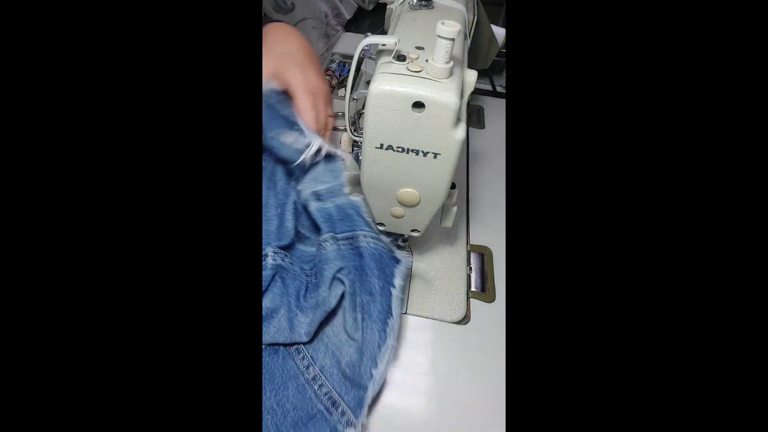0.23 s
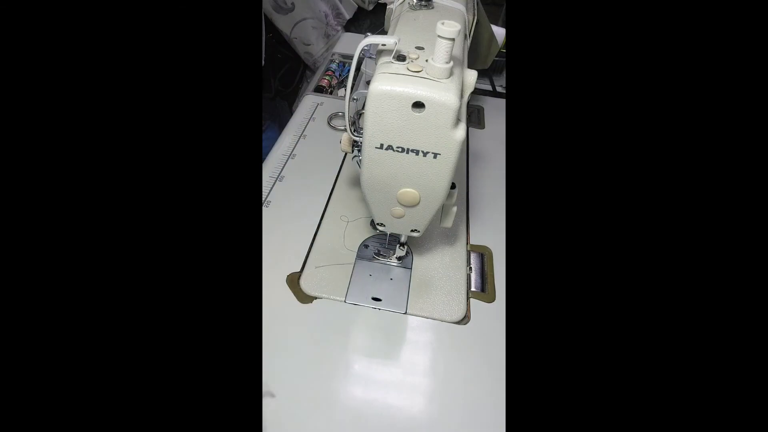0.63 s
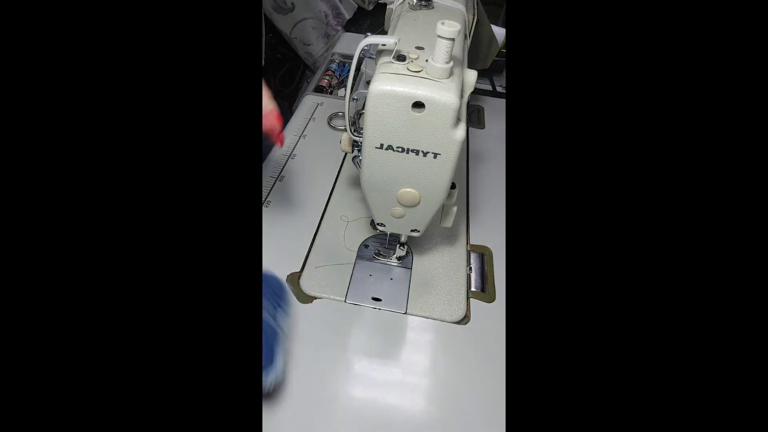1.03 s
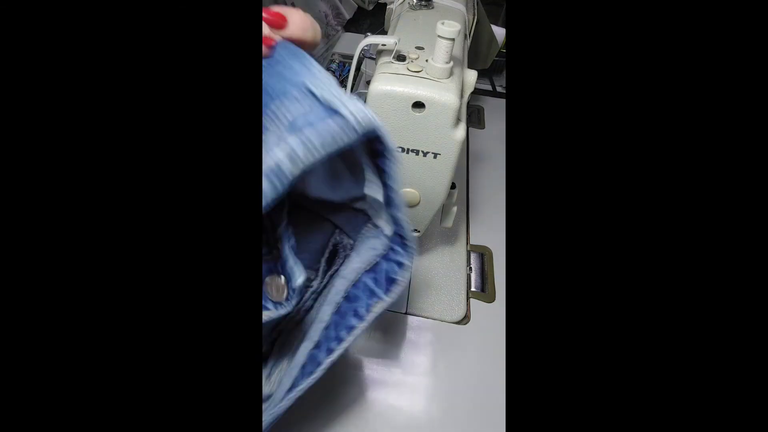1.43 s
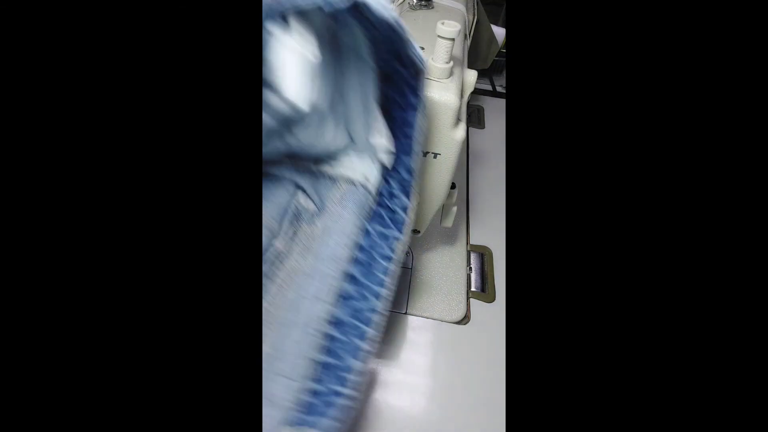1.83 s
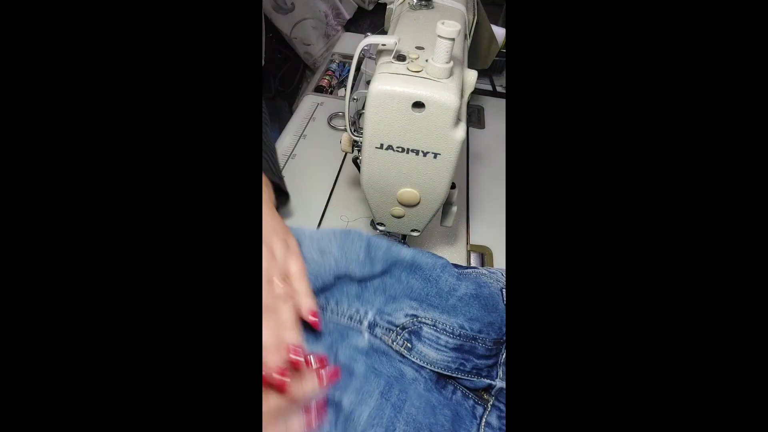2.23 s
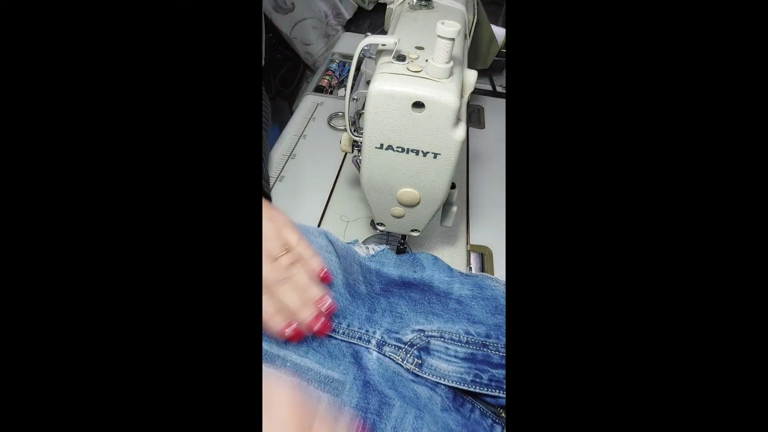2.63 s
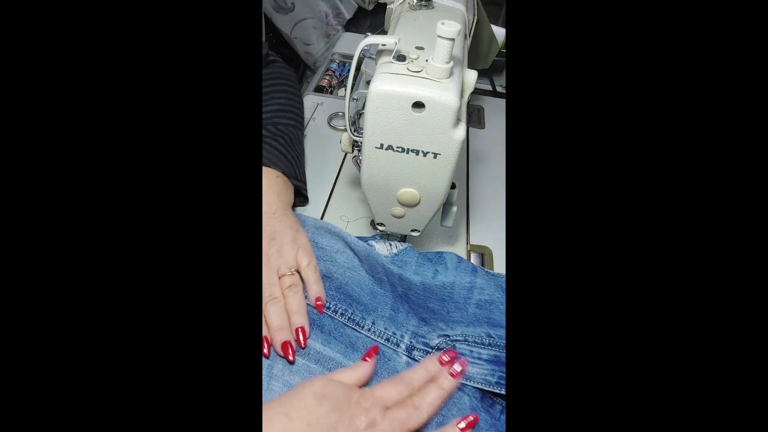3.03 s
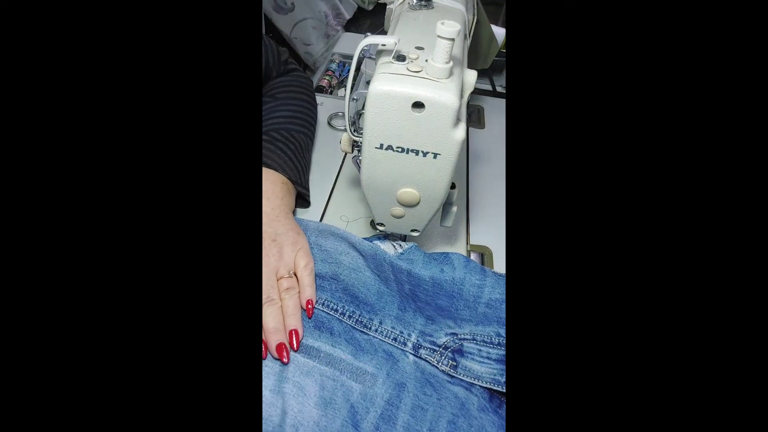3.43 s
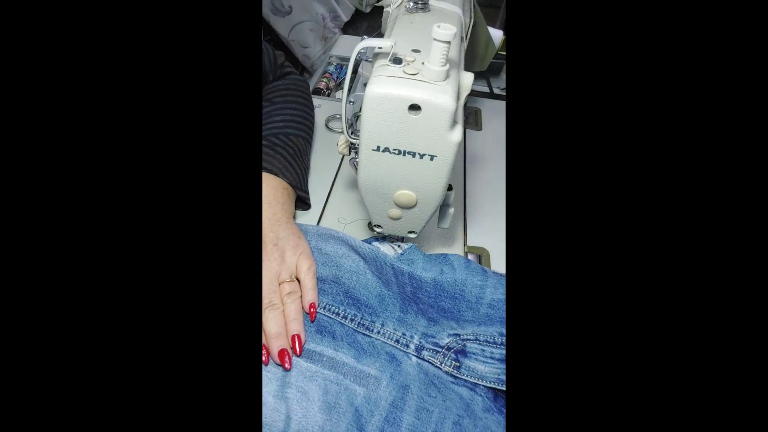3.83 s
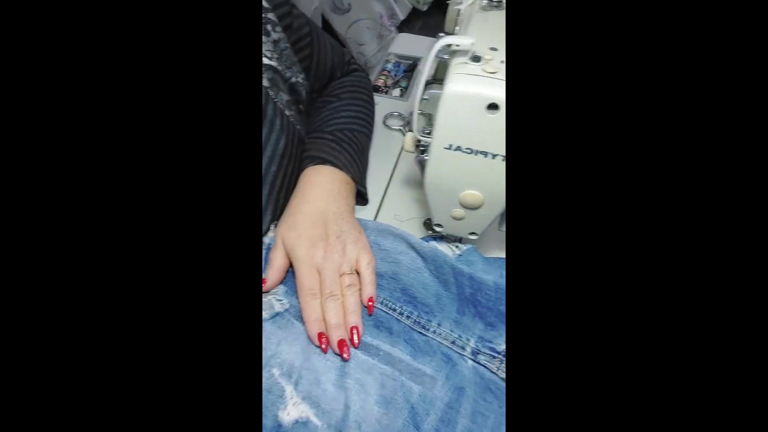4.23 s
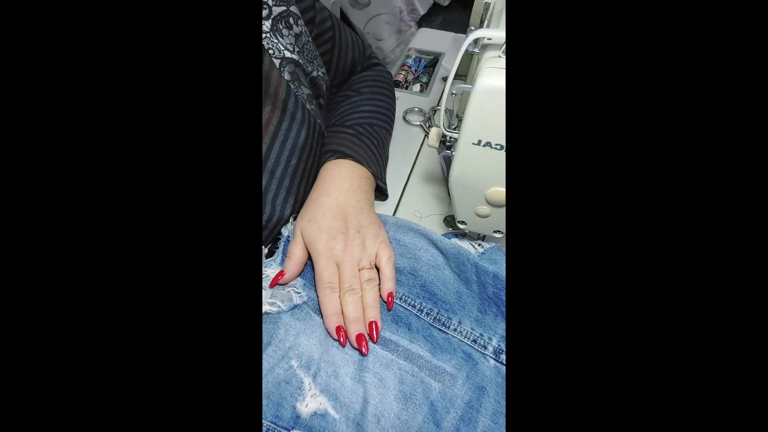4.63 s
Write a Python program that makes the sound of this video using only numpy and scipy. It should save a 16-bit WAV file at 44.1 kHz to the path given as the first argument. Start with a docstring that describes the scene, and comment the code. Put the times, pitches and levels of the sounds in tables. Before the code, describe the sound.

Stiff denim is dragged, flapped and smoothed on a sewing-machine table, with soft thumps, a brief metallic skid and a final knock.

```python
"""Jeans on a sewing-machine table

Stiff jeans are pulled off the table, turned over, laid down again and smoothed by hand. The denim
brushes and flaps, its weight thumps on the top, seams and fingernails tick, and a metal button skids
ringing over the steel bed. At the end a hard, hollow object is nudged and knocks against the table.
Small workshop, close microphone."""
import sys
import numpy as np
from scipy import signal
from scipy.fft import rfft, irfft
from scipy.io import wavfile

SR = 44100
rng = np.random.default_rng(int(sys.argv[2]) if len(sys.argv) > 2 else 0)


def materialize(psi):
    """Save the field psi as 16-bit PCM at rate SR to the path in sys.argv[1].

    A 1-D psi becomes a single channel; in a 2-D psi each row is a channel.
    """
    bounded = np.clip(np.atleast_2d(psi).T, -1, 1)
    quanta = np.round(bounded * 32767).astype(np.int16)
    wavfile.write(sys.argv[1], SR, quanta)


N = 210308
TIME = np.arange(N) / SR
AGE = TIME[:SR // 4]   # seconds since a contact began


def from_db(db):
    """Decibels to gain."""
    return 10 ** (np.asarray(db) / 20)


def unit_rms(x):
    """Scale to rms 1."""
    return x / np.sqrt(np.mean(x ** 2) + 1e-20)


def at_hz(points, hz):
    """Read a curve on a log-frequency axis."""
    freqs, values = np.transpose(points)
    return np.interp(np.log(hz + 1e-9), np.log(freqs), values)


def highpass(x, hz, order=2):
    """Butterworth low cut."""
    return signal.sosfilt(signal.butter(order, hz, "high", fs=SR, output="sos"), x + 1e-18)


def panned(x, pan_db):
    """Place a sound in stereo; pan_db is left level minus right."""
    return x * from_db(np.array([[.5], [-.5]]) * pan_db)


def add(track, start_s, sound):
    """Mix a short sound into a track at its cue."""
    part = track[..., max(round(start_s * SR), 0):][..., :len(AGE)]
    part += sound[..., :part.shape[-1]]


def drift(rate_hz):
    """A random wobble, gliding from value to value; rms 1."""
    knots = rng.standard_normal(4000)
    return unit_rms(np.interp(TIME * rate_hz, np.arange(len(knots)), knots))


# Stereo image, narrow in the bass and wide on top: freq_hz, correlation
STEREO_LIKENESS = [(60, 0.46), (130, 1), (290, 0.44), (640, 0.5), (1400, -0.25), (3100, .05),
                   (15000, 0.091)]


def noise(colour):
    """Stereo noise shaped by (freq_hz, level_db) points; rms 1."""
    hz = np.arange(N // 2 + 1) * SR / N
    mid, side = rfft(rng.standard_normal((2, N))) * from_db(at_hz(colour, hz))
    alike = np.clip(at_hz(STEREO_LIKENESS, hz), -1, 1)
    spectrum = np.sqrt(1 + alike) * mid + np.sqrt(1 - alike) * side * [[1], [-1]]
    return unit_rms(irfft(spectrum, N))


def burst(decay_s, rise_s):
    """Force of one contact: fast attack, exponential decay; peak 1."""
    shape = (1 - np.exp(-AGE / rise_s)) ** 2 * np.exp(-AGE / max(decay_s, 3e-4))
    return shape / shape.max()


def resonate(x, modes):
    """Parallel resonators of alternating polarity."""
    out = 0
    for k, (hz, width_hz, db) in enumerate(modes):
        radius = np.exp(-np.pi * width_hz / SR)
        poles = [1, -2 * radius * np.cos(2 * np.pi * hz / SR), radius ** 2]
        gain = (-1) ** k * from_db(db) * (1 - radius ** 2) / 2
        out = out + gain * signal.lfilter([1, 0, -1], poles, x + 1e-18)
    return out


def grains(per_s, spread_db):
    """Tiny catches of uneven size at random moments; rms 1."""
    born = rng.random((2, N)) < per_s / SR
    sizes = from_db(spread_db * np.minimum(rng.exponential(1, (2, N)), 4))
    return unit_rms(born * sizes * rng.choice([-1, 1], (2, N)))


def stray_contacts(per_s, decay_s):
    """Force of small, uneven contacts at random moments."""
    hits = (rng.random(N) < per_s / SR) * rng.random(N)
    return signal.fftconvolve(hits, burst(decay_s, rise_s=0.00087))[:N]


def stroke(start_s, length_s, rise_share=0.31, release_db_per_s=190):
    """One movement gathers speed, holds it, then comes to rest; peak 1."""
    age = TIME - start_s
    rise = np.clip(age / (rise_share * length_s), 0, 1)
    release = from_db(-release_db_per_s * np.maximum(age - length_s, 0))
    return np.sin(rise * np.pi / 2) ** 2 * release


def movements(rows):
    """One envelope for each level column of a stroke table; overlaps add in power."""
    gains = (from_db(levels)[:, None] * stroke(start_s, length_s) for start_s, length_s, *levels in rows)
    return np.sqrt(sum(gain ** 2 for gain in gains))


# Colour of the quiet workshop: freq_hz, level_db
ROOM_TONE_COLOUR = [(20, -12.5), (45, 0), (130, -3.5), (190, -14), (270, -6.5), (440, -25), (1200, -30),
                    (3000, -38), (15000, -38.5)]


def room_tone():
    """A faint, steady, bass-heavy bed, leaning left."""
    return panned(from_db(-65) * noise(ROOM_TONE_COLOUR), pan_db=4.5)


# Reverb time of the workshop: freq_hz, t60_s
ROOM_DECAY = [(80, 0.58), (500, 0.21), (3000, 0.15), (14000, 0.17)]


def room_reverb(send):
    """Diffuse reflections build over a few milliseconds; the bass hangs on longest."""
    age, tail = TIME[:SR // 2], 0
    for low_hz in 45 * 2 ** np.arange(9):
        octave = signal.butter(2, [low_hz, min(2 * low_hz, .45 * SR)], "band", fs=SR, output="sos")
        scatter = signal.sosfilt(octave, rng.standard_normal((2, len(age))))
        tail = tail + scatter * from_db(-60 * age / at_hz(ROOM_DECAY, low_hz * np.sqrt(2)))
    tail = unit_rms(tail * np.minimum(age / .006, 1)) / np.sqrt(len(age))
    return signal.fftconvolve(send, tail, axes=1)[:, :N]


# Body of the hollow object: pitch_hz, width_hz, level_db
HOLLOW_MODES = [(438.5, 67, 13), (1090, 117, 2), (1360, 124, -3), (2310, 300, -5.5), (4473, 270, -21.5)]
# Colour of the table under anything that slides: freq_hz, level_db
RUMBLE_COLOUR = [(20, -19.5), (45, -0.5), (65, 3.5), (120, -1), (190, -7), (270, -2), (380, -17.5),
                 (700, -45.5)]
# Small shoves leading up to the knock: start_s, length_s, rub_db, drone_db
NUDGE_CUES = [(4.07, 0.032, -61.5, -66.5), (4.24, 0.061, -58, -53), (4.32, 0.14, -63.5, -60.5),
              (4.5, 0.13, -76, -51.5)]


def nudged_object(drone_hz=108.6, drone_width_hz=31):
    """The hollow object rubs faintly as it is moved, and a table resonance drones under it."""
    rub_gain, drone_gain = movements(NUDGE_CUES)
    drone = unit_rms(resonate(noise(RUMBLE_COLOUR), [(drone_hz, drone_width_hz, 0)]))
    rub = unit_rms(resonate(grains(per_s=600, spread_db=-4), HOLLOW_MODES))
    return rub_gain * rub + drone_gain * drone


# Ring of the closing knock: pitch_hz, level_db, t60_s
KNOCK_MODES = [(102, -9, 1.5), (236, -4, .2), (293, -5, .14), (355, -8, .15), (506, -12, .18),
               (833, -14, .11), (1009, -1, .13), (1083, 0, .13), (1135, -4, .12), (1222, -1, .13),
               (1390, -2, .11), (1443, -6, .09), (1800, -9, .09), (1911, -4, .1), (2035, 2, .1),
               (2113, 1, .1), (2210, -2, .11), (2304, -7, .09), (2610, -11, .09), (3429, -27, .2)]


def knock(start_s=4.63, gain_db=-26.5):
    """A hard object hits the table: a short crack, low modes that swell, high ones that ring wide."""
    ringing, force = np.zeros((2, 2, N))
    for hz, db, t60_s in KNOCK_MODES:
        width = np.clip(1 - at_hz(STEREO_LIKENESS, hz), 0, 1)
        phase = rng.uniform(-np.pi, np.pi, (2, 1)) * width
        swell = 1 - np.exp(-AGE * hz / 3.2)   # attack of about three cycles
        mode = from_db(db - 60 * AGE / t60_s) * swell * np.sin(2 * np.pi * hz * AGE + phase)
        pan_db = at_hz([(100, -9), (400, -12), (1300, -4), (2200, 2)], hz)
        add(ringing, start_s, panned(mode, pan_db))
    add(force, start_s, burst(decay_s=0.0077, rise_s=0.00073))
    crack = force * noise([(150, 2), (1000, -2.5), (2200, 2.5), (3500, -11), (7000, -24), (15000, -28.5)])
    return from_db(gain_db) * (ringing + from_db(3.5) * crack)


# Bright ring of the button and steel bed: pitch_hz, width_hz, level_db
METAL_MODES = [(3440, 80, -24), (4080, 30, -26), (4360, 30, -24), (4640, 25, -25), (4840, 25, -22),
               (5240, 42, -12), (5540, 30, -13), (6120, 35, -14), (6830, 50, -11), (7340, 65, -10),
               (8850, 45, -3), (9050, 75, -5), (10170, 60, -5), (11170, 32, 0), (11480, 32, -1),
               (11810, 65, 0), (12260, 85, -3), (12900, 150, -13), (13550, 42, 0), (14200, 70, -9),
               (15340, 55, -2)]
# Skids of the button: start_s, level_db, decay_s
SKID_CUES = [(0.237, -8, 0.0092), (0.239, -6.5, 0.039), (0.274, -14, 0.034), (0.296, -7, 0.0057),
             (0.315, -16, 0.035), (0.384, -16, 0.0034), (0.436, -23, 0.0063), (0.497, -44.5, 0.0092)]


def button_skids():
    """Metal skids on steel: chattering stick-slip catches ring its high modes over a dry scratch."""
    pressure = np.zeros(N)
    for start_s, db, decay_s in SKID_CUES:
        add(pressure, start_s, from_db(db) * burst(decay_s, rise_s=0.0048))
    chatter = from_db(3.2 * drift(rate_hz=450))
    catches = pressure * chatter * grains(per_s=9000, spread_db=-4.5)
    # the point of contact wanders, so each mode's level wavers on its own
    ringing = sum(resonate(catches * from_db(6 + 0.47 * drift(rate_hz=45)), [m]) for m in METAL_MODES)
    scratch = from_db(-12) * highpass(catches, 9500, order=6)
    return panned(ringing + scratch, pan_db=-1.5)


# Ticks of seams, rivets and fingernails: start_s, level_db, pan_db, decay_s
TICK_CUES = [(0.0388, -12.5, 3, 0.0063), (0.0675, -13.5, -3, 0.0032), (0.118, -29, -2, 0.0031),
             (0.162, -32.5, 0, 0.0045), (0.17, -26.5, -3, 0.0028), (0.241, -8, 0, 0.0037),
             (0.698, -38, -2, 0.0051), (1.061, -48.5, -5, .003), (1.088, -41.5, -2, 0.0032),
             (1.5772, -41.5, -2, 0.0023), (1.634, -42, 0.5, 0.0064), (1.8593, -29.5, -10.5, .002),
             (1.892, -34, 9, .002), (2.1836, -26, 6, 0.0042), (2.214, -30, -4, .002),
             (2.249, -16.5, -2.5, 0.0013), (2.3076, -20.5, -2, 0.0071), (2.324, -19, 3, 0.0057),
             (2.3536, -21, -0.5, 0.0015), (2.36, -31.5, 3, 0.0017), (2.431, -41.5, -1, 0.0045),
             (2.487, -24.5, -2, .0015), (2.506, -17, 2.5, 0.0029), (3.0294, -27, -1, 0.005),
             (3.9513, -52, -13.5, .003), (4.254, -46, -10, 0.0034), (4.4106, -34.5, -4.5, 0.0034)]


def seam_ticks():
    """A hard spot catches and lets go in a tight cluster of snaps; the metal answers faintly."""
    force = np.zeros((2, N))
    for start_s, db, pan_db, decay_s in TICK_CUES:
        add(force, start_s, panned(from_db(db - 8.5) * burst(decay_s, rise_s=0.00024), pan_db))
    snaps = force * highpass(grains(per_s=31000, spread_db=8), 2100)
    return snaps + from_db(-5) * resonate(snaps, METAL_MODES)


# Midrange rustle of the folds: freq_hz, level_db
RUSTLE_COLOUR = [(150, -17.5), (350, -3), (550, -1), (850, 0), (1300, -7), (2400, -9.5), (4000, -25),
                 (9000, -44)]
# Airy hiss of the weave: freq_hz, level_db
HISS_COLOUR = [(500, -12), (1200, 2), (2200, 2), (3200, -2), (4500, 1), (6500, -4), (7800, -1), (9500, -4),
               (12500, 1.4), (15500, -6), (17000, -14)]
# Fading bed of hiss and rustle, as held jeans never lie quite still: time_s, level_db
HANDLING_BED = [(0.0, -65), (2.4, -72), (2.85, -78.5), (3.9, -86.5)]
# Dragging, lifting, spreading and smoothing: start_s, length_s, hiss_db, rustle_db
CLOTH_STROKES = [(0.03, 0.29, -65, -56.5), (0.28, 0.059, -38.5, -35), (0.44, 0.069, -59.5, -46.5),
                 (0.58, 0.16, -65, -62), (0.81, 0.14, -65.5, -59.5), (1.04, 0.12, -66.5, -66),
                 (1.29, 0.099, -64.5, -57), (1.41, 0.1, -62.5, -60), (1.6, 0.23, -62, -58.5),
                 (1.84, 0.066, -51, -53.5), (1.92, 0.21, -53.5, -56.5), (2.14, 0.14, -55.5, -47),
                 (2.45, 0.067, -54, -45), (2.47, 0.26, -47, -54), (2.94, 0.1, -55, -50.5),
                 (3.05, 0.11, -59.5, -66), (3.15, 0.25, -54, -60.5), (3.42, 0.31, -73.5, -81),
                 (4.07, 0.05, -76.5, -72.5), (4.245, 0.042, -62.5, -70), (4.395, 0.032, -63, -55.5)]


def sliding_denim():
    """The weave hisses and its threads catch, folds rustle in fits, and the table rumbles underneath."""
    bed_db = np.interp(TIME, *np.transpose(HANDLING_BED))
    weave, folds = np.hypot(movements(CLOTH_STROKES), from_db(bed_db))
    creases = from_db(1) * stray_contacts(per_s=13, decay_s=0.0035)   # small folds giving way
    folds = folds * (1 + creases)
    rumble_swing = (folds / from_db(-57.5)) ** 0.69   # rides the rustle with less dynamic range
    rumble = from_db(-56) * rumble_swing * noise(RUMBLE_COLOUR)
    rustle = folds * from_db(-2 + 0.86 * drift(rate_hz=77)) * noise(RUSTLE_COLOUR)
    hiss = weave * from_db(-0.23 + drift(rate_hz=370)) * noise(HISS_COLOUR)
    catching = from_db(-10) + from_db(4.5) * stray_contacts(per_s=5, decay_s=0.002)
    threads = weave * catching * highpass(grains(per_s=1100, spread_db=2), 2500)
    return rumble + rustle + panned(hiss + threads, pan_db=-1.5)


# Folds slapping down: start_s, level_db, puff_decay_s, pop_pitch_hz
FLAP_CUES = [(0.037, -18, 0.024, 2375), (0.065, -19, 0.0041, 400), (0.239, -13.5, 0.0047, 894),
             (0.306, -13.5, 0.0024, 1120), (0.312, -13, 0.019, 570), (0.381, -24, 0.019, 1130),
             (0.437, -32, 0.016, 907), (0.956, -49, 0.012, 458), (1.309, -43.5, 0.0022, 710),
             (1.358, -41.5, 0.0053, 536), (1.472, -43, 0.0031, 495), (1.736, -47.5, 0.006, 664),
             (2.189, -26, 0.0019, 680), (2.235, -33.5, 0.0018, 470), (2.302, -29.5, 0.0065, 670),
             (2.4435, -27.5, 0.0032, 714), (2.484, -30, 0.012, 544), (2.504, -32, 0.0063, 510),
             (2.513, -27, 0.0022, 620), (2.961, -35, 0.021, 760), (3.002, -36.5, 0.0088, 387)]


def denim_flaps():
    """A stiff fold slaps down: a puff of noise, and a short hollow pop from the air trapped under it."""
    force, pops = np.zeros((2, 2, N))
    for start_s, db, decay_s, hz in FLAP_CUES:
        phase = rng.normal(0, 1, (2, 1))
        pop = burst(decay_s=0.0017, rise_s=0.00079) * np.sin(2 * np.pi * hz * AGE + phase)
        add(pops, start_s, from_db(db) * pop)
        add(force, start_s, from_db(db) * burst(decay_s, rise_s=0.00054))
    puff = noise([(120, -19), (350, -1), (550, -7.5), (680, -6.5), (880, -2.5), (1600, -3.5),
                  (3000, -17), (4500, -29), (9000, -43)])
    return from_db(-6.5) * force * puff + from_db(-0.5) * pops


# Body of the table top: pitch_hz, width_hz, level_db
TABLE_MODES = [(62.4, 27, -3), (81.8, 32, 0.5), (121, 47, 1), (151.8, 3.3, -5.5), (255.8, 26, -2.5),
               (303.9, 30, 2), (370, 54, -9.5), (582, 15, -17)]
# Low thumps of cloth and hands landing; at 0.248 s, a puff of air hits the left microphone:
# start_s, level_db, pan_db, pitch_hz, decay_s
THUMP_CUES = [(0.045, -28, -3, 118, 0.017), (0.067, -13.5, -2, 136, 0.0079),
              (0.082, -21.5, -4, 267, 0.0084), (0.123, -41, 1, 103, 0.015), (0.246, -21, -3, 281.5, 0.0073),
              (0.248, -25.5, 19, 73.4, 0.0059), (0.306, -26, -21.5, 295, 0.0076),
              (0.315, -21.5, -5, 250, 0.007), (0.319, -22, -2, 117, .014), (0.341, -34, 5, 255, .012),
              (0.382, -30.5, -6.5, 307, 0.03), (0.483, -31.5, -6, 172, 0.0051),
              (0.533, -42, -2, 123, 0.012), (0.645, -44.5, 1, 160.6, 0.019), (0.706, -42, -3, 175.5, 0.02),
              (1.317, -38, -3, 74.9, 0.0091), (1.742, -41.5, -0.5, 84, 0.0073),
              (2.193, -17.5, -9, 131, 0.0013), (2.236, -25.5, -2.5, 119, 0.0053),
              (2.308, -33.5, 0, 262.3, 0.013), (2.5, -25.5, -4, 98, 0.0074), (2.519, -26, -1, 109.5, 0.015),
              (2.966, -26, 1, 132, 0.012), (3.002, -25, 0, 78, 0.0082), (3.022, -34.5, -3, 111, 0.02)]


def low_thumps():
    """Each thump is a few damped low swings and a dull burst of noise, coloured by the table's modes."""
    swings, envelope = np.zeros((2, 2, N))
    for start_s, db, pan_db, hz, decay_s in THUMP_CUES:
        force = panned(from_db(db) * burst(decay_s, rise_s=0.0024), pan_db)
        add(swings, start_s, force * np.sin(2 * np.pi * hz * AGE))
        add(envelope, start_s, force)
    thud = envelope * noise([(30, -2.5), (300, -2), (600, -4), (1500, -29)])
    body = resonate(from_db(-12.5) * swings + from_db(-6) * thud, TABLE_MODES)
    return swings + from_db(-14) * thud + body


def scene():
    """Hits and skids feed the reverb; room tone, sliding denim and nudges stay dry."""
    soft_hits = low_thumps() + denim_flaps()
    ticks, skids, rap = seam_ticks(), button_skids(), knock()
    send = from_db(-14.5) * soft_hits + from_db(-15) * ticks + from_db(-16.5) * skids + from_db(-6) * rap
    reverb = room_reverb(send)
    return room_tone() + sliding_denim() + nudged_object() + soft_hits + ticks + skids + rap + reverb


def record(dry):
    """Master chain: low cut, soft-clipped peaks, steep high cut."""
    rounded = np.tanh(highpass(dry, hz=52))
    high_cut = signal.ellip(10, .2, 80, 15750, fs=SR, output="sos")
    return signal.sosfilt(high_cut, rounded)


dry = scene()
out = record(dry)
materialize(out)
```